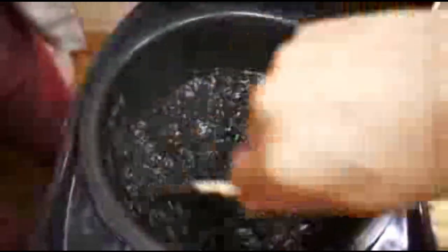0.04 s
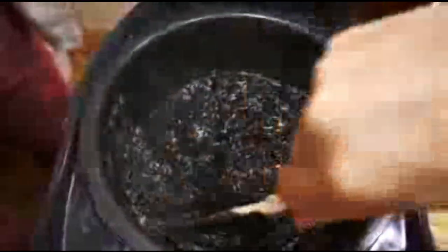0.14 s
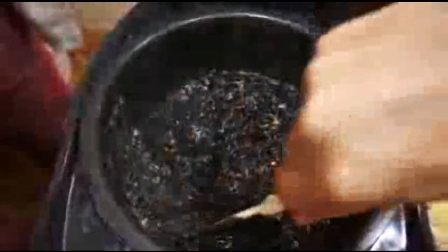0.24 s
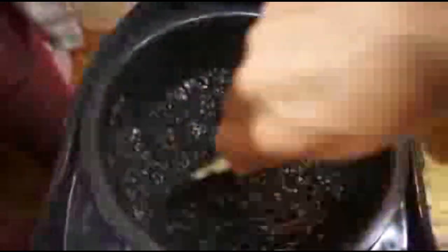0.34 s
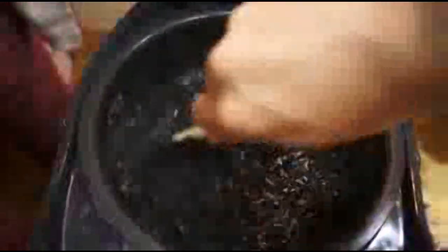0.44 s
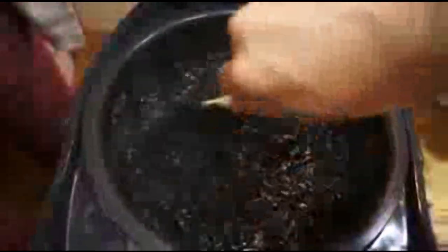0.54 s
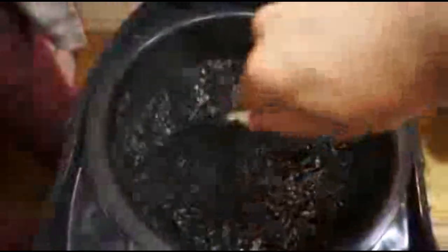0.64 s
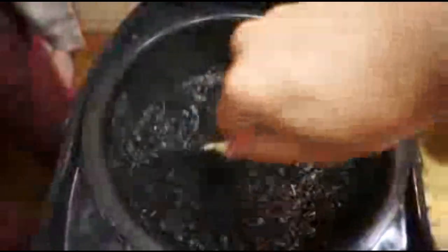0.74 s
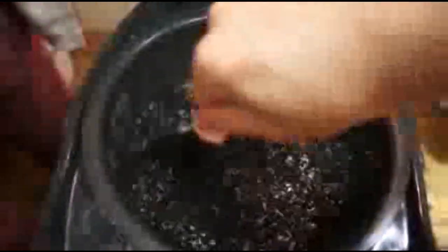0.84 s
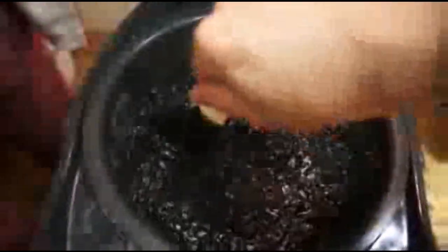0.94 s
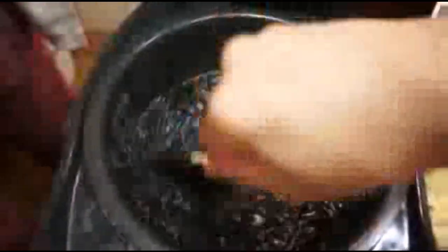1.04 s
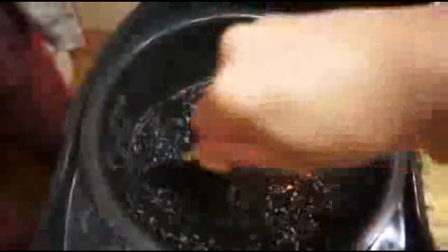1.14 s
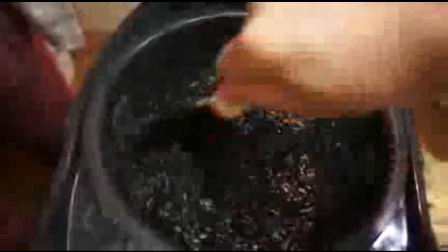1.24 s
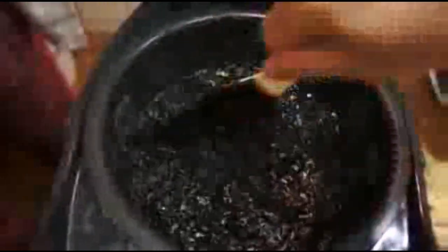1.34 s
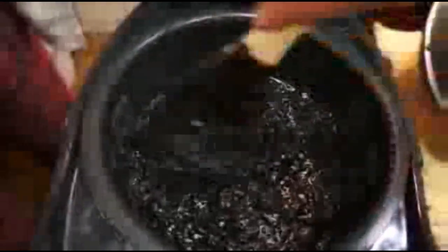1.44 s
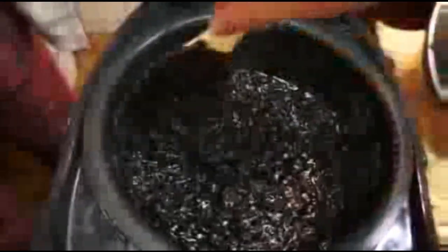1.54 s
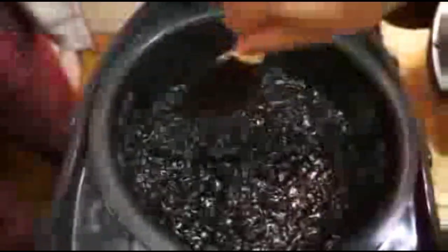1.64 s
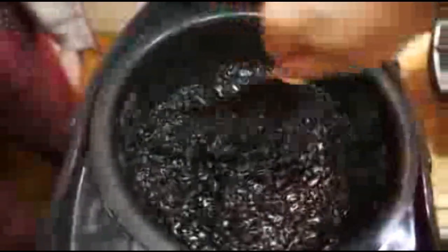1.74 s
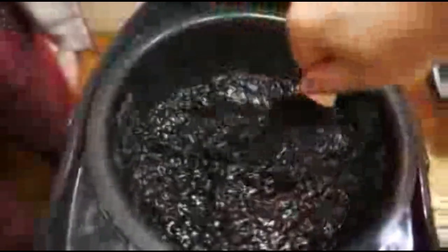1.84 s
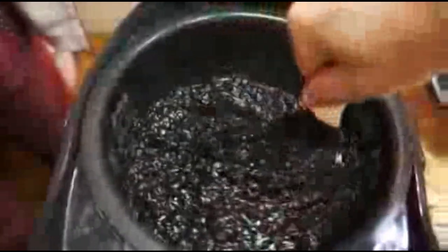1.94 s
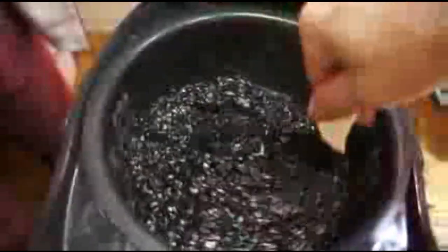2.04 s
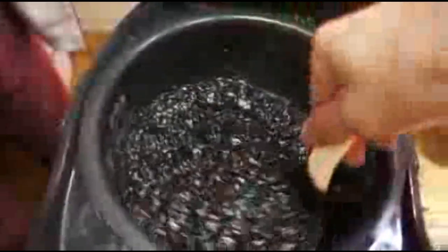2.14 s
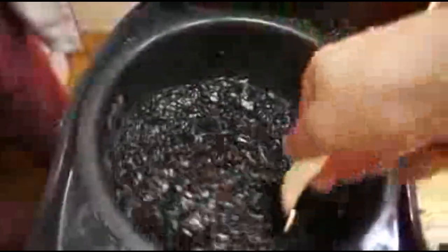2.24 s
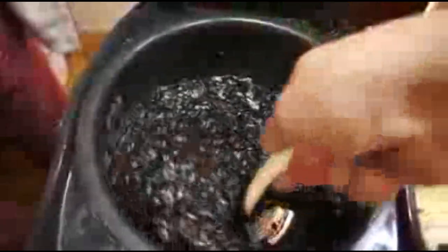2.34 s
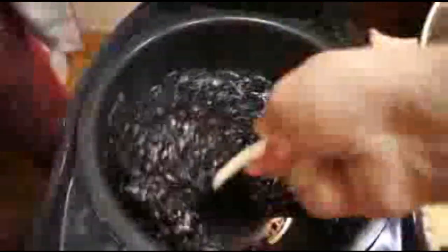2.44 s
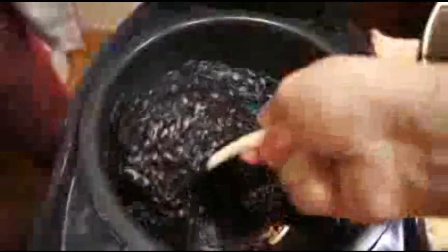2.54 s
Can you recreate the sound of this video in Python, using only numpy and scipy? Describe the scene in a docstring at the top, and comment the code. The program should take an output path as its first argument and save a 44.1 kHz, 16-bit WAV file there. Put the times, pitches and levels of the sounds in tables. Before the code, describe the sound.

Close to the microphone, a paddle stirs sticky rice: an early clack, uneven softer knocks, a low thump near two seconds, then steadier hollow rubbing and moist ticking, with a short room tail.

```python
"""A plastic paddle stirs sticky rice in a cooker's pot, close to the microphone in a small kitchen.
Its knocks on the wall are shaped clicks driving decaying modes and dense echoes of the pot.
Along the bottom it drags with a hollow rub of random slips, with wet blips and a rasp of its edge.
Sticky grains part in filtered crackles and pops; the cooker sways faintly in the low end.
Near reflections, a short room tail and still kitchen air surround the pot."""
import sys
import numpy as np
from scipy import signal
from scipy.fft import rfft, irfft, next_fast_len
from scipy.io import wavfile
from scipy.ndimage import map_coordinates

SR = 44100
rng = np.random.default_rng(int(sys.argv[2]) if len(sys.argv) > 2 else 0)


def persist_wave(psi):
    """Save psi, clipped to +-1, as 16-bit WAV."""
    counts = np.round(np.clip(psi, -1, 1) * 32767).astype(np.int16)
    wavfile.write(sys.argv[1], SR, np.atleast_2d(counts).T)


N = 114660  # length in samples, 2.6 s

# how hard the steady rubbing goes, before each layer's own gain: time_s, level_db
RUB_COURSE = [(0.0, -64.5), (0.17, -72.5), (0.3, -64.5), (0.43, -63.5), (0.57, -53), (0.69, -57),
              (1.24, -64), (1.35, -57), (1.52, -61.5), (1.77, -73), (1.93, -52.5), (2.06, -55.5),
              (2.45, -53), (2.6, -50)]
# stereo width by frequency: pitch_hz, side_over_mid_db
STEREO_WIDTH = [(100, -28.5), (500, -14), (1200, -11), (2800, -10.5), (5000, -2.5), (8000, -4)]


def amp(db):
    """Decibels to a linear gain."""
    return 10 ** (np.asarray(db) / 20)


def unit(x):
    """The sound scaled to rms 1."""
    return x / np.sqrt(np.mean(x ** 2) + 1e-20)


def along(points, hz):
    """Values at hz, read from (Hz, value) points on a log axis."""
    point_hz, value = np.transpose(points)
    return np.interp(np.log(hz + 1), np.log(point_hz + 1), value)


def filtered(x, response):
    """The sound with its spectrum multiplied by a response of frequency."""
    n = x.shape[-1]
    padded = next_fast_len(n + 8192)
    spectrum = rfft(x, padded) * response(np.fft.rfftfreq(padded, 1 / SR))
    return irfft(spectrum, padded)[..., :n]


def coloured(x, points):
    """The sound filtered through (Hz, dB) points, at rms 1."""
    return unit(filtered(x, lambda f: amp(along(points, f))))


def hump(hz, octaves):
    """The response of a broad resonance around hz, at half gain this many octaves away."""
    return lambda f: 1 / (1 + (np.log2((f + 1) / hz) / octaves) ** 2)


def pulse(points, size=2048):
    """A causal, minimum-phase click with the given spectrum, made by folding its cepstrum."""
    cepstrum = irfft(np.log(amp(along(points, np.fft.rfftfreq(size, 1 / SR)))))
    cepstrum[1:size // 2] *= 2
    cepstrum[size // 2 + 1:] = 0
    return irfft(np.exp(rfft(cepstrum)))


def add(track, start_s, sound):
    """Mix a sound into the track at its start time."""
    i = max(0, round(start_s * SR))
    track[i:i + len(sound)] += sound[:max(0, N - i)]


def curve(rows):
    """Gain per sample from (s, dB) rows."""
    return amp(np.interp(np.arange(N) / SR, *np.transpose(rows)))


def swell(middle_s, half_s):
    """A smooth Gaussian rise and fall; half_s is its standard deviation."""
    return np.exp(-.5 * ((np.arange(N) / SR - middle_s) / half_s) ** 2)


def slips(rate, spread_db):
    """Tiny random impulses of uneven size and either sign, on average rate per second."""
    size = amp(spread_db * np.minimum(rng.exponential(size=N), 3))
    return (rng.random(N) < rate / SR) * size * rng.choice([-1, 1], N)


def clumps(depth_db):
    """A random gain that swells and sinks with the lumps of rice."""
    knots_per_s = 46
    knots = rng.standard_normal(1024)
    smooth = map_coordinates(knots, [np.arange(N) * knots_per_s / SR], mode="wrap")
    return amp(depth_db * smooth)


def still_air():
    """The quiet air of the kitchen, as coloured noise."""
    level_db = -65
    # spectrum of the kitchen air: pitch_hz, gain_db
    air_colour = [(25, -7), (60, -11.5), (150, -1), (300, 0), (550, -14), (1000, -6), (1600, -8.5),
                  (3000, -11), (6000, -19), (7900, -4.5), (12000, -16)]
    return amp(level_db) * coloured(rng.standard_normal(N), air_colour)


def kitchen(x):
    """The room's tail: decaying noise, shorter in the treble, convolved with the sound."""
    gap_s = 0.0071  # before the tail arrives
    # decay of the small kitchen: pitch_hz, t60_s
    room_decay = [(150, 0.85), (500, 0.35), (2000, 0.32), (8000, 0.28)]
    hz, t, bands = signal.stft(rng.standard_normal(SR // 2), SR, nperseg=256)
    bands = bands * amp(-60 * t / along(room_decay, hz)[:, None])
    tail = signal.istft(bands, SR, nperseg=256)[1]
    tail = np.pad(tail, (round(gap_s * SR), 0))
    return signal.fftconvolve(x, tail / np.linalg.norm(tail))[:N]


def spread(x):
    """Near reflections, as a short noise burst, make the two sides differ, mostly in the treble."""
    t = np.arange(SR // 20) / SR
    walls = rng.standard_normal(len(t)) * amp(-60 * t / .04)
    side = signal.fftconvolve(x, walls / np.linalg.norm(walls))[:N]
    side = filtered(side, lambda f: amp(along(STEREO_WIDTH, f)))
    return np.array([x + side, x - side])


def rocking():
    """The whole cooker rocks after a heavy push: low noise in brief, faint swells."""
    # sways of the cooker: middle_s, half_s, level_db
    sways = [(.51, 0.012, -57), (1.97, 0.031, -57.5)]
    # spectrum of the sway: pitch_hz, gain_db
    sway_colour = [(15, -15), (32, -9), (55, -10), (90, -38.5), (200, -37.5), (500, -100)]
    push = sum(amp(db) * swell(middle_s, half_s) for middle_s, half_s, db in sways)
    return push * coloured(rng.standard_normal(N), sway_colour)


def scrapes():
    """The paddle's edge skims the wall and rasps: dense slips through a narrow resonance."""
    # skims along the wall: middle_s, half_s, level_db, pitch_hz
    skims = [(0.212, 0.037, -52, 6100), (0.624, 0.011, -47, 6170), (0.616, 0.0063, -42.5, 3130),
             (0.913, 0.013, -57, 2400), (1.52, 0.0093, -56.5, 2320), (1.867, 0.027, -56.5, 3460),
             (1.914, 0.01, -44.5, 3400), (1.915, 0.0065, -38, 1440), (2.224, 0.022, -52, 7650),
             (2.335, 0.053, -64.5, 2870), (2.504, 0.075, -64, 2300)]
    out = np.zeros(N)
    for middle_s, half_s, db, hz in skims:
        rasp = filtered(slips(rate=4800, spread_db=-4.5), hump(hz, octaves=0.29))
        out += amp(db) * swell(middle_s, half_s) * unit(rasp)
    return out


def squish():
    """Tiny wet air pockets open between the grains, each a brief rising sine blip."""
    gain_db, blips_per_s = -14, 250
    middle_hz, reach_octaves = 2020, 0.76  # pitches lie this far either way
    decay_cycles, rise = 38, 0.087  # cycles to fall 60 dB, phase stretch by then
    out, t = np.zeros(N), np.arange(SR // 30) / SR
    for when, pitch, size in rng.random((int(blips_per_s * N / SR), 3)):
        hz = middle_hz * 2 ** (reach_octaves * (2 * pitch - 1))
        age = t * hz / decay_cycles
        blip = np.sin(2 * np.pi * hz * t * (1 + rise * age))
        add(out, when * N / SR, amp(5.4 * size - 60 * age) * blip)
    return amp(gain_db) * curve(RUB_COURSE) * unit(out)


def rubbing():
    """Rice slips under the paddle and sounds the hollow of the pot, more so at each shove."""
    # paddle shoving rice along the bottom: middle_s, half_s, level_db, strongest_hz
    shoves = [(0.188, 0.025, -47, 610), (0.301, 0.0095, -51.5, 247), (.467, 0.011, -46.5, 168),
              (0.669, 0.0053, -49.5, 550), (0.745, 0.034, -61.5, 607), (0.89, 0.014, -47.5, 520),
              (0.921, 0.015, -43.5, 310), (1.028, 0.029, -51.5, 530), (1.224, 0.0092, -43.5, 327),
              (1.773, 0.0088, -49, 420), (1.941, 0.038, -46.5, 306), (2.27, 0.052, -48.5, 650),
              (2.528, 0.0061, -43.5, 273)]
    # spectrum of the shoves, ahead of their own resonance: pitch_hz, gain_db
    shove_colour = [(60, -3), (150, -20.5), (240, -15), (290, 2), (390, -9), (520, 2), (700, -6),
                    (1200, -5.5), (1800, -6), (3500, -19), (8000, -5)]
    # spectrum of the steady rub: pitch_hz, gain_db
    rub_colour = [(60, -13), (150, -7.5), (290, 1.5), (390, 5), (530, 10.5), (700, 8), (950, -0.5),
                  (1300, -5.5), (1750, -28), (2300, -12.5), (3500, -15.5), (8000, -45)]
    gain_db = -4.5  # on top of the rub's course
    rub = coloured(slips(rate=2200, spread_db=2.5), rub_colour)
    out = amp(gain_db) * curve(RUB_COURSE) * clumps(depth_db=3.65) * rub
    drag = coloured(slips(rate=4700, spread_db=3.1), shove_colour)
    for middle_s, half_s, db, hz in shoves:
        hollow = unit(filtered(drag, hump(hz, octaves=0.76)))
        out += amp(db) * swell(middle_s, half_s) * hollow
    return out


def crackle():
    """Sticky grains of three sizes part in a fine clumped crackle, with a few louder noise pops."""
    # course of the wet crackle, before its gain: time_s, level_db
    stick_course = [(0.0, -75), (0.1, -86.5), (0.28, -65), (0.54, -76.5), (0.65, -68.5), (1.0, -76.5),
                    (1.28, -71), (1.42, -66), (1.58, -78), (1.79, -88), (1.9, -77), (2.2, -81.5),
                    (2.39, -73), (2.6, -84)]
    # spectrum of the crackle: pitch_hz, gain_db
    stick_colour = [(300, 9.5), (1000, 9.5), (2300, -8), (3200, -7), (3700, -6), (4250, -3.5), (4700, -7.5),
                    (5300, -6.5), (5900, 0.5), (7000, 0), (7800, 3.5), (9000, -16.5), (16000, -2)]
    # large, middling and small sticky threads: pitch_hz
    thread_hz = [2220, 4330, 6650]
    # single grains pulling free, before the pop gain: start_s, level_db, pitch_hz
    grain_pops = [(0.144, -44, 4050), (.162, -35.5, 6900), (0.193, -37, 3850), (0.203, -32.5, 6350),
                  (0.2106, -34, 6650), (0.231, -33, 5200), (0.3202, -41, 6000), (.380, -44, 6500),
                  (0.419, -43.5, 6230), (0.593, -38.5, 3100), (.662, -40.5, 2220), (0.726, -44.5, 2460),
                  (.923, -42.5, 3700), (1.0189, -45.5, 6080), (1.039, -38.5, 7000), (1.1648, -45, 2130),
                  (1.336, -46, 5300), (1.3774, -39.5, 7560), (1.434, -39, 7400), (1.5194, -41, 2290),
                  (1.7488, -31, 2880), (1.8338, -44.5, 3070), (1.8446, -43, 3800), (1.9006, -33, 3500),
                  (1.943, -41, 3200), (1.985, -45, 1970), (2.028, -44, 7500), (2.113, -50.5, 3440),
                  (2.23, -40.5, 7500), (2.31, -40, 3280), (2.437, -43, 2370), (2.498, -43.5, 1950),
                  (2.583, -37, 2820)]
    crackle_gain_db, pop_gain_db, pop_t60_s = 8.5, -3.5, 0.019
    grains = np.zeros(N)
    for hz in thread_hz:
        grains += filtered(slips(rate=740, spread_db=4.5), hump(hz, octaves=0.86))
    fine = coloured(clumps(depth_db=6) * grains, stick_colour)
    out = amp(crackle_gain_db) * curve(stick_course) * fine
    t = np.arange(SR // 20) / SR
    for start_s, db, hz in grain_pops:
        burst = rng.standard_normal(len(t)) * amp(-60 * t / pop_t60_s)
        pop = filtered(burst, lambda f: hump(hz, octaves=1)(f) ** 2)
        add(out, start_s, amp(db + pop_gain_db) * unit(pop) * np.sqrt(pop_t60_s))
    return out


def noise_tail(t, t60_s, level_db):
    """Decaying noise with little below 910 Hz, its total energy set by level_db."""
    noise = filtered(rng.standard_normal(len(t)), lambda f: f / np.hypot(f, 910))
    noise *= amp(-60 * t / t60_s)
    return noise * amp(level_db) / np.linalg.norm(noise)


def pot_body(t, modes):
    """The pot's answer to a tap: a direct push, dense echoes inside it and its decaying modes."""
    build_s, push_db = 0.00027, -8  # the modes take a moment to build up
    body = noise_tail(t, t60_s=0.047, level_db=-11)
    for hz, db, t60_s in modes:
        decay = amp(-60 * t / t60_s) * (1 - np.exp(-(t / build_s) ** 2))
        mode_hz = hz * (1 + 0.02 * rng.standard_normal())
        phase = .5 * rng.standard_normal()
        body += 2 * amp(db) * decay / decay.sum() * np.cos(2 * np.pi * mode_hz * t + phase)
    body[0] += amp(push_db)
    return body


def knocks():
    """Each contact, with a short chatter after it, drives the pot's echoes, modes and wall there."""
    # paddle on the pot, levels before the knock gain:
    # start_s, thud_db, hollow_db, clack_db, ring_db, crack_db, wall_hz (pitch of the wall at that spot)
    contacts = [(0.1162, -51, -30.5, -28.5, -15.5, -42, 1300), (0.3632, -55.5, -48, -63.5, -43, -68.5, 864),
                (0.4304, -59, -45.5, -54.5, -57, -60, 1210), (0.461, -48, -32, -45.5, -44.5, -48.5, 933),
                (0.6131, -48, -41.5, -40.5, -39, -31, 1514), (0.908, -41, -67, -37.5, -36, -47.5, 926),
                (0.9907, -41.5, -32.5, -28, -32.5, -58, 1370), (1.2832, -43.5, -37, -34.5, -40, -48, 777),
                (1.7362, -63.5, -46, -38, -26.5, -41, 1250), (1.9150, -26.5, -26, -48.5, -30.5, -52, 794),
                (2.18, -48, -38, -23.5, -28.5, -32, 740), (2.2995, -75.5, -44.5, -57, -62, -53.5, 560),
                (2.5637, -63.5, -48, -47.5, -35, -58, 774)]
    # centres of thud, hollow, clack, ring and crack: pitch_hz
    register_hz = [240, 510, 1150, 2600, 5600]
    # modes of the rice-filled pot, before a small random detuning: pitch_hz, gain_db, t60_s
    pot_modes = [(165.2, 0, 0.091), (253.6, 4, 0.047), (304.5, 2.5, 0.038), (511.6, 9.5, 0.03),
                 (749, 1, 0.024), (985, -3.5, 0.027), (1269, 1.5, 0.027), (1520, -2.5, 0.078),
                 (2104, -4.5, 0.03), (2935, -10.5, 0.018), (3405, -7, 0.022), (4420, -17.5, 0.09),
                 (5114, -0.5, 0.013), (6690, 10, .04), (7250, 6, 0.019)]
    knock_gain_db, wall_db, wall_t60_s = 20.5, 6, 0.013
    lead_s, lead_db = 0.002015, -20.5  # the edge touches just before the full blow
    out, t = np.zeros(N), np.arange(SR // 4) / SR
    for start_s, *levels, wall_hz in contacts:
        colour = [(hz, db - 10 * np.log10(hz / SR)) for hz, db in zip(register_hz, levels)]
        thud_db, crack_db = colour[0][1], colour[-1][1]
        low_end = [(50, thud_db - 24), (135, thud_db - 10)]
        force = amp(knock_gain_db) * pulse(low_end + colour + [(16000, crack_db - 5)])
        chatter = noise_tail(t, t60_s=.05, level_db=-7.5)
        chatter[0] = 1  # the blow itself
        body = pot_body(t, pot_modes + [(wall_hz, wall_db, wall_t60_s)])
        struck = signal.fftconvolve(body, chatter)
        add(out, start_s, signal.fftconvolve(struck, force))
        add(out, start_s - lead_s, amp(lead_db) * force)
    return out


def scene():
    """All sounds of the pot, with the room's tail and still air around them."""
    room_db, left_db = -12.5, -.75  # the right side gets the opposite of left_db
    pot = rocking() + scrapes() + squish() + rubbing() + crackle() + knocks()
    mid, side = [amp(room_db) * kitchen(pot) + still_air() for _ in range(2)]
    # the surroundings are 3 dB wider than the pot, their side gain never above 0 dB
    side = filtered(side, lambda f: amp(np.minimum(along(STEREO_WIDTH, f) + 3, 0)))
    around = np.array([mid + side, mid - side])
    return (spread(pot) + around) * amp([[left_db], [-left_db]])


def record(dry):
    """The overall tone: full up to 8 kHz, a steep drop above, a narrow band near 14.5 kHz, no more past 16."""
    # overall tone curve: pitch_hz, gain_db
    tone_curve = [(20, 3), (7900, -2), (8350, -37), (13600, -17), (14500, 0.5), (15400, -23)]
    top_hz = 16000
    return filtered(dry, lambda f: amp(along(tone_curve, f)) * (f < top_hz))


dry = scene()
out = record(dry)
persist_wave(out)
```